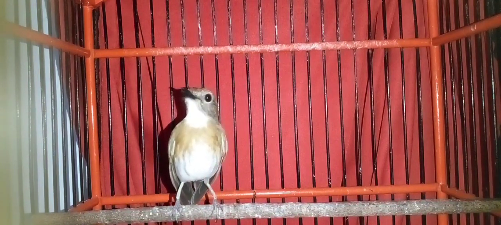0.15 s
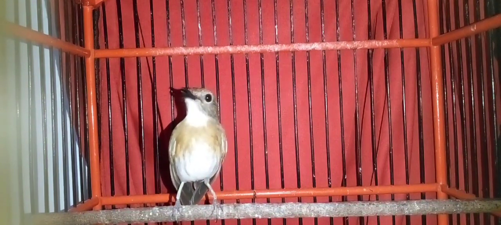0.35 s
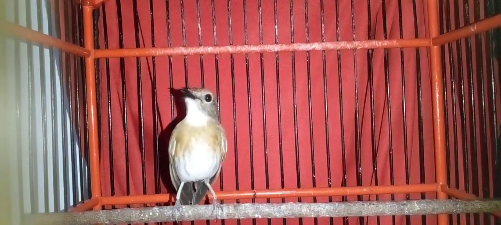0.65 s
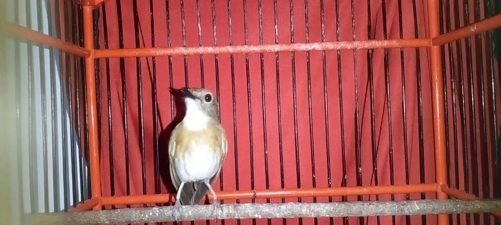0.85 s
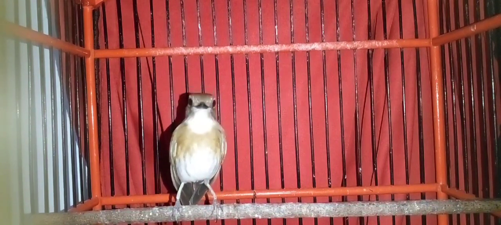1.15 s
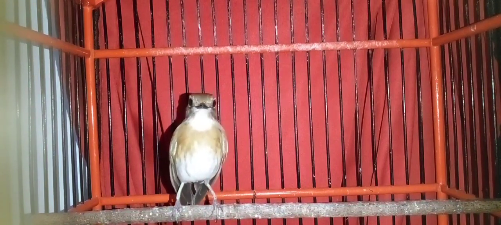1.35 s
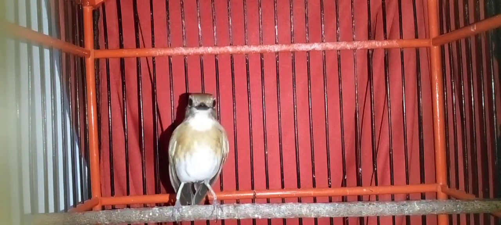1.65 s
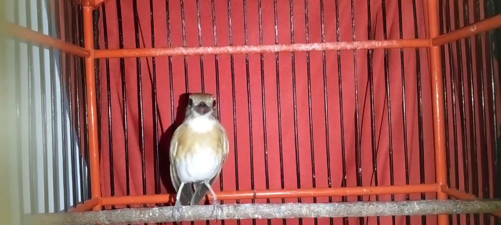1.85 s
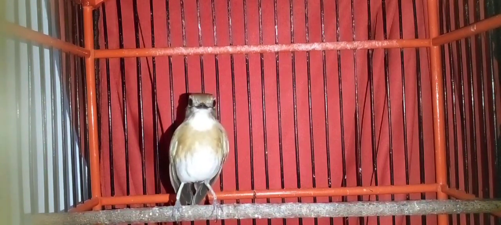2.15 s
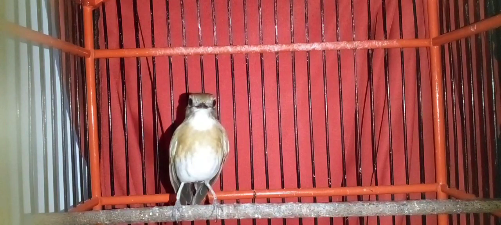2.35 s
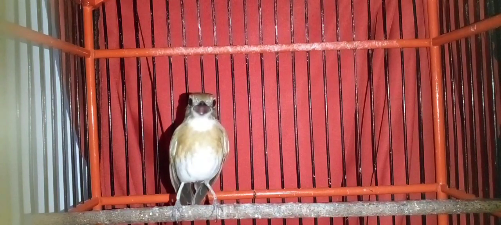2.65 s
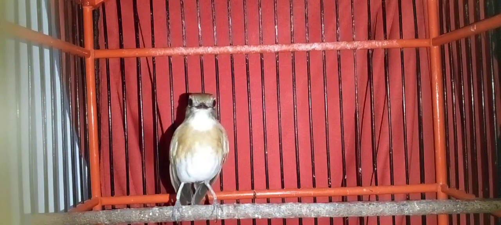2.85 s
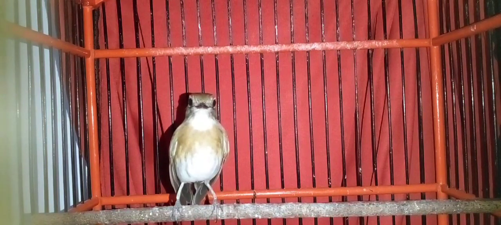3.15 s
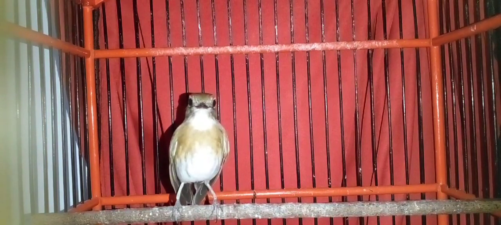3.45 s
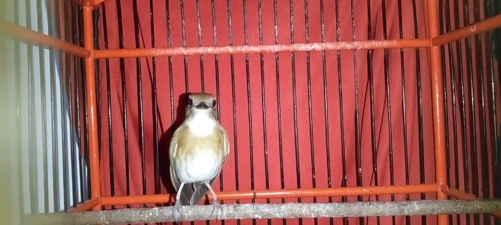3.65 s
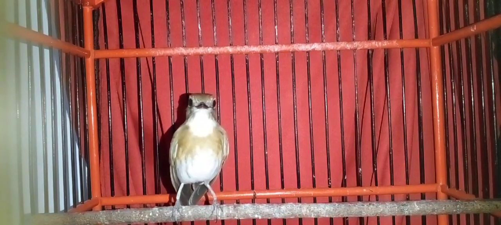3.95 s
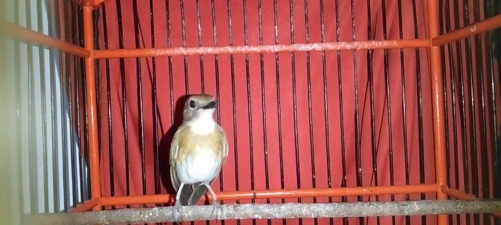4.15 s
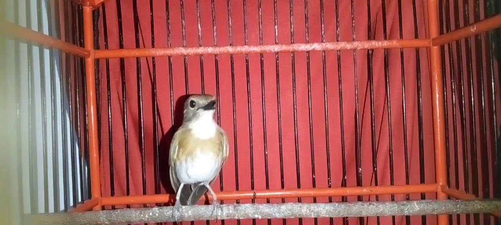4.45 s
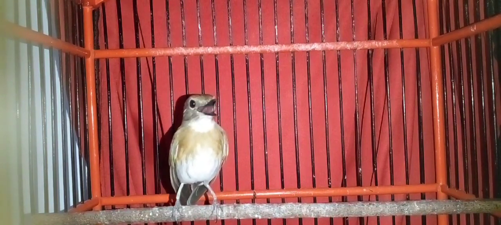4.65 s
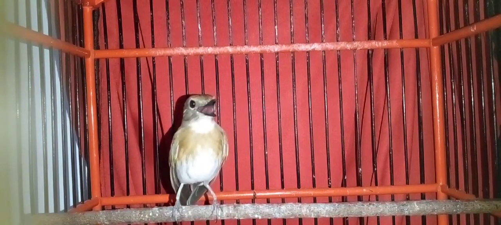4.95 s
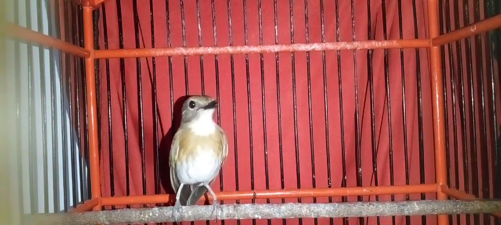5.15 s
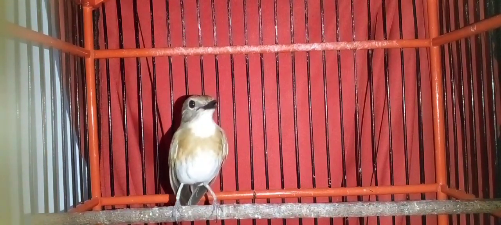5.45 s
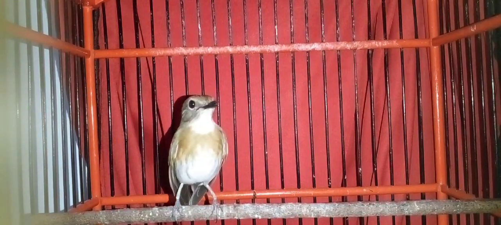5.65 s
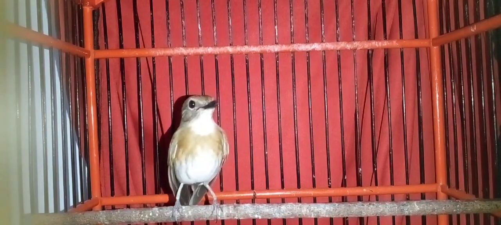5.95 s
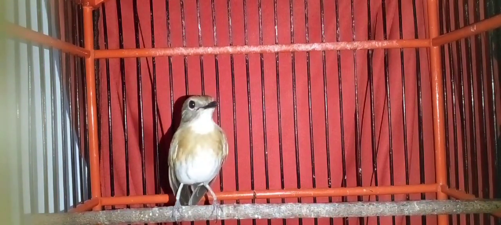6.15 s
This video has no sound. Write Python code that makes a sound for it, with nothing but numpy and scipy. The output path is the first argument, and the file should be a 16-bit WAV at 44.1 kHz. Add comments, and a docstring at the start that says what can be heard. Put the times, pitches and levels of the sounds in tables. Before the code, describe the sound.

Close, loud bird song indoors, varied and broken by short pauses, ends in rapid high trills and quavering tweets while a far vehicle slowly approaches.

```python
"""A small caged songbird sings close to the microphone in a quiet room at night: two-voiced squeals, twitters,
whip-like chips, pure whistles, falling trills and quavering tweets, built from gliding partials and shaped noise.
Its bill ticks faintly; near walls echo it and the room rings briefly.
Far-off engines hum outside as wavering low tones, over filtered-noise rumble and tyres that draw nearer.
A thin high hiss hangs in the background."""
import sys
import numpy as np
from scipy import signal
from scipy.fft import rfft, irfft
from scipy.io import wavfile
from scipy.ndimage import uniform_filter1d, minimum_filter1d

SR = 44100
rng = np.random.default_rng(int(sys.argv[2]) if len(sys.argv) > 2 else 0)


def store_pcm(level_fs):
    """Save levels as 16-bit WAV."""
    pcm = np.round(np.clip(level_fs, -1, 1) * 32767).astype(np.int16)
    wavfile.write(sys.argv[1], SR, np.atleast_2d(pcm).T)


N = 278712
LEAD_S = .3  # the tracks begin this early, so sounds may already be under way
TOP_HZ = 15900  # the recorder's upper limit

# two voices at once: start_s, length_s, low_hz, high_from_hz, high_to_hz, level_db, roughness at the peak (0-1)
SQUEAL_NOTES = [(.225, 0.1256, 5495, 8048, 7784, -29, 0.25), (.442, .139, 5415, 8080, 7477, -27.5, .3)]
# a level note, then a low slur: start_s, length_s, from_hz, to_hz, level_db, slur_length_s, slur_db
TWITTER_NOTES = [(.793, 0.0299, 2813, 2995, -16.5, 0.04, -28),
                 (0.862, 0.0275, 2439, 3148, -14.5, 0.0463, -25),
                 (.948, 0.03094, 2629, 3069, -13.5, 0.0319, -23.5),
                 (1.054, 0.033, 2597, 2885, -18, 0.024, -24.5),
                 (1.191, 0.0304, 3340, 3020, -16, 0.0216, -26)]
# rising chips that move into their octave: start_s, length_s, from_hz, to_hz, octave_level_db
CHIP_NOTES = [(1.709, .059, 2632, 3021, -4.5), (1.864, .055, 2780, 3061, -5)]
# very fast downward whips: loudest_s, rise_s, fall_s, top_hz, end_hz, level_db, rasp_db, thump_db
WHIP_NOTES = [(1.763, 0.00491, 0.0183, 5700, 2871, -7.5, -20.5, -31.5),
              (1.922, 0.00389, 0.01164, 5778, 2799, -6.5, -26, -31),
              (2.6658, 0.007, 0.0076, 6300, 2318, -13, -14, -39.5),
              (2.7167, 0.00495, 0.00556, 6433, 2075, -7.5, -11.5, -23.5)]
# rasp of the whips: pitch_hz, relative level (dB per Hz)
WHIP_RASP_SPECTRUM = [(900, -22.5), (1600, -4), (6600, 22), (8500, -14), (12500, 2)]
# a rush of air that leads into the first lone whip: start_s, length_s, level_db
AIR_RUSH = (2.647, .018, -39)
# mellow whistles: start_s, length_s, from_hz, to_hz, level_db, loudest at (share of length), fade_db,
# flutter from (share of length), flutter depth (0-1), overtones_db, hoarseness at the end (0-1)
WHISTLE_NOTES = [(3.607, 0.2394, 2668, 3168, -13, 0.768, 4, 0.147, .67, -1, 0.01),
                 (3.958, 0.2127, 2455, 2195, -21, 0.451, 13, 0.481, 0.77, 2, 0.02),
                 (4.33, .2, 2648, 3202, -10, 0.896, 4, 0.053, 0.31, -4.5, 0.01)]
# overtones of the whistles from the octave up: level_db against the fundamental
WHISTLE_OVERTONES_DB = [-30, -51.5, -46.5, -46.5, -47.5]
# faint slides between the louder notes: start_s, length_s, from_hz, to_hz, level_db
SLIDE_NOTES = [(0.576, 0.0515, 8150, 8477, -34), (0.728, 0.185, 5939, 5883, -44.5),
               (0.907, 0.0468, 2124, 2410, -36), (0.909, 0.03, 3060, 3468, -31.5),
               (.998, .032, 3079, 2873, -23.5), (4.573, 0.0508, 6067, 6053, -33.5)]
# the octave of a slide grows with its end pitch: pitch_hz, level_db against the fundamental
SLIDE_OCTAVE_LEVELS = [(3300, -32.5), (5800, -8)]
# thin falling whistles: start_s, length_s, from_hz, to_hz, level_db
THIN_NOTES = [(3.195, 0.3102, 7299, 5850, -36), (6.034, 0.336, 7095, 6174, -37.5)]
# piercing notes that open each trill: start_s, length_s, pitch_hz, level_db, swell_db
PIERCING_NOTES = [(4.599, 0.01614, 5937, -8.5, 11.5), (4.624, 0.0141, 6279, -2, 6),
                  (4.833, 0.0296, 5604, -16.5, 17), (4.85, 0.0226, 5641, -8.5, 13.5),
                  (4.876, .023, 5657, -7, 0.5), (4.9, 0.02024, 5720, -3, 12)]
# trill notes, held high then snapped down: loudest_s, top_hz, snap_hz, top_db, snap_db, thump_db, thump_hz
TRILL_NOTES = [(4.635, 5970, 5705, -25, -30.5, -27.5, 58), (4.665, 7304, 6686, -17, -8.5, -34, 235.6),
               (4.694, 7742, 6847, -17, -11, -31, 231.2), (4.725, 8194, 7066, -18, -11, -28.5, 283),
               (4.752, 8332, 7870, -21.5, -16, -30.5, 270.5), (4.941, 6578, 6283, -8, -3, -15.5, 93.5),
               (4.9707, 7716, 6114, -30, -4.5, -17, 149), (4.999, 7883, 6206, -25, -4, -22.5, 224.3),
               (5.028, 7832, 6953, -21, -10, -28, 250)]
# tweets that leap up and quaver away: start_s, length_s, top_hz, level_db, fade_db, quaver from (s into the note)
TWEET_NOTES = [(-.125, 0.0877, 4002, -12, 18.5, 0.0463), (5.088, 0.1018, 3770, -10, 9.5, 0.0544),
               (5.28, 0.1312, 3844, -9, 14.5, 0.0495), (5.488, 0.1079, 4750, -8.5, 21, .05),
               (6.007, 0.0994, 3953, -9.5, 17.5, 0.0369)]
# overtones of the piercing notes: level_db against the fundamental
PIERCING_OVERTONES_DB = [-24.5]
# overtones above the octave in chips and tweets: level_db against that octave
OCTAVE_OVERTONES_DB = [-34, -23]
# faint dry ticks: start_s, level_db
BILL_TICKS = [(2.829, -42.5), (2.863, -42), (5.791, -47), (5.84, -45.5)]
# near walls: delay_s, level_db
WALL_ECHOES = [(.0045, -13), (0.0141, -16.5)]
# bands of the room's tail: centre_hz, weight_db, t60_s
ROOM_BANDS = [(2198, -14, 0.4), (3310, -20.5, 0.57), (5960, -16.5, 0.42), (11500, -11.5, 0.29)]
# far engines that come and go: start_s, length_s, from_hz, to_hz, level_db
ENGINE_RUNS = [(-.2, 1.178, 90.02, 81.37, -39.5), (.9, 0.599, 81.22, 78.65, -37),
               (1.498, 1.085, 98.42, 88.15, -47), (2.5, 1.028, 92.8, 87.39, -48),
               (3.652, 1.1, 93.14, 94.89, -52)]
# a low hum that sinks slowly and wavers: from_hz, to_hz, level_db
LOW_HUM = (170, 140, -57.5)
# spectra of the low rumble, the tyres and the hiss: pitch_hz, relative level (dB per Hz)
RUMBLE_SPECTRUM = [(18, -49.5), (30, -15.5), (91, -6.5), (172, -9), (194, -17), (1800, -68.5), (2700, -110)]
TYRE_SPECTRUM = [(40, -13.5), (100, 5.5), (600, -13), (1500, -23.5), (2600, -31), (8000, -46)]
HISS_SPECTRUM = [(5000, -25), (6400, -1.5), (7600, -18.5)]
# a vehicle drawing nearer: time_s, level_db
TYRE_LEVELS = [(4.3, -67), (5.3, -60), (6.32, -47)]


def squeals(flutter_hz=105, throb=.55, rough_hz=380, high_octave_db=-9, low_octave_db=-11, sum_db=-12,
            difference_db=-24, settle_hz=800, settle_s=.08, rough_per_db=.1746, rasp_db=-13, onset_db=5):
    """Both sides of the syrinx flutter alone and modulate each other; the low voice starts ragged and settles."""
    for start, length, low_hz, from_hz, to_hz, peak_db, roughness in SQUEAL_NOTES:
        t, u = clock(length)
        level_db = arch(u, peak=0.705, rise_db=13, fall_db=2.5)
        rough = roughness + rough_per_db * level_db  # passes below zero in the quiet parts
        ragged = np.exp(-t / (settle_s * roughness))  # rougher notes settle later
        low_beat, high_beat = (quaver(t, flutter_hz, .35) for _ in range(2))
        depth = np.minimum(2 * rough, throb)

        low_pitch = low_hz + settle_hz * ragged * (1 + low_beat) + rough * rough_hz * walk(t, 2500)
        low = (1 + depth * low_beat) * tone(low_pitch, [low_octave_db])
        high_glide = from_hz + (to_hz - from_hz) * ease(u / .85)
        high_pitch = high_glide + rough * rough_hz * (walk(t, 2500) + high_beat)
        high = (1 + depth * high_beat) * tone(high_pitch, [high_octave_db])

        # multiplying the voices gives their sum and difference tones
        mixed = colour(low * high * (1 + low), [(1500, -55), (2500, difference_db), (13000, sum_db)])
        rasp = rough * noise(t, [(1500, -47.5), (2500, -11.5), (7000, -12), (10000, -15.5), (15000, -9.5)])
        onset_rasp = undb(onset_db) * ragged * noise(t, [(4800, -39), (6200, 3.5), (9500, -37)])
        voices = high + undb(onset_db * ragged - 5) * low + mixed
        soft_ends = signal.windows.tukey(len(t), .15)
        yield start, undb(peak_db + level_db) * soft_ends * (voices + undb(rasp_db) * (rasp + onset_rasp))


def twitters(settle_s=.0058, slur_top_hz=2260, slur_end_hz=1970, crest=0.16, overlap=.42, slur_jitter=0.014,
             rasp_db=-18, grain_db=2.5):
    """A short note bends onto its pitch; the syrinx's other side takes over with a hoarse, grainy falling slur."""
    for start, length, from_hz, to_hz, peak_db, slur_length, slur_db in TWITTER_NOTES:
        t, u = clock(length)
        hz = (to_hz + (from_hz - to_hz) * np.exp(-t / settle_s)) * (1 + 0.014 * walk(t, 790))
        yield start, undb(peak_db + arch(u, peak=0.72, rise_db=13, fall_db=5.5)) * tone(hz, [-31])

        t, u = clock(slur_length)
        jitter = slur_jitter * (walk(t, 2000) + walk(t, 200) / 2)
        bend = ((u - crest) / (1 - crest)) ** 2
        hz = (slur_top_hz + (slur_end_hz - slur_top_hz) * bend) * (1 + jitter)
        octave = undb(-13 + grain_db * walk(t, 270)) * tone(hz, [-16], first=2)
        rasp = noise(t, [(500, -24.5), (1300, -16.5), (2200, 4), (4400, 1), (7500, -19.5)])
        slur = tone(hz) + octave + undb(rasp_db) * rasp
        level_db = slur_db + arch(u, peak=.55, rise_db=12, fall_db=8) + grain_db * walk(t, 200)
        yield start + length - overlap * slur_length, undb(level_db) * slur


def chips(glide_share=.78, lift=0.21, split_s=0.013, low_voice_db=-15):
    """The throat rings near 6 kHz, so the octave outgrows the lower voice, which splits off upward at the end."""
    for start, length, from_hz, to_hz, level_db in CHIP_NOTES:
        t, u = clock(length)
        hz = (from_hz + (to_hz - from_hz) * ease(u / glide_share)) * (1 + 0.02 * walk(t, 560))
        split = lift * np.maximum(1 - (length - t) / split_s, 0)
        low = undb(low_voice_db + arch(u, peak=0.97, rise_db=25, fall_db=3.5)) * tone(hz * (1 + split))
        octave_level = undb(arch(u, peak=.98, rise_db=55, fall_db=-5.5))  # still growing at the end
        octave = octave_level * tone(hz, OCTAVE_OVERTONES_DB, first=2)
        yield start, undb(level_db) * (low + octave)


def whips(recoil_hz=4400, recoil_db=-13, attack_db=24, plunge_share=.66, plunge_db=16, recoil_share=1.6):
    """The pitch plunges within milliseconds, breaks up and curls back, with a rasp at its loudest."""
    for loudest, rise, fall, top, end, peak_db, rasp_db, thump_db in WHIP_NOTES:
        t, _ = clock(rise + (plunge_share + recoil_share) * fall)
        attack = np.minimum(t / rise, 1)
        plunge = np.clip((t - rise) / (plunge_share * fall), 0, 1)
        recoil = np.maximum((t - rise) / fall - plunge_share, 0) / recoil_share

        hz = top + (end - top) * plunge + (recoil_hz - end) * ease(recoil / .36)
        hz = hz * (1 + .14 * plunge * walk(t, 1500))
        plunge_level = attack_db * (attack - 1) - plunge_db * plunge
        recoil_level = recoil_db + arch(recoil, peak=.48, rise_db=19.5, fall_db=16)
        level_db = np.where(recoil > 0, recoil_level, plunge_level)

        voice = undb(level_db + peak_db) * tone(hz, [-28])
        rasp_fades = ease(attack) * ease(2 * (1 - recoil))
        rasp = undb(level_db / 2 + rasp_db) * rasp_fades * noise(t, WHIP_RASP_SPECTRUM)
        yield loudest - rise, voice + rasp
        yield thump(loudest, thump_db)


def air_rush():
    """A brief rush of noise in the colour of the whips' rasp."""
    start, length, level_db = AIR_RUSH
    t, u = clock(length)
    yield start, undb(level_db) * ease(10 * u) * ease(10 * (1 - u)) * noise(t, WHIP_RASP_SPECTRUM)


def thump(loudest, level_db, pitch_hz=130, cycles=.6, burst_db=-12, burst_s=0.0055):
    """The sharpest notes jolt the microphone: a low thump in a soft noise burst; higher is shorter and noisier."""
    t = np.arange(SR // 10) / SR - 1 / 50
    beats = t * pitch_hz
    jolt = np.cos(2 * np.pi * beats) * ease(2 * beats + 1) * np.exp(-np.maximum(beats, 0) / cycles)
    burst = noise(t, [(400, 4.5), (1500, -14), (2100, -27.5)]) * np.exp(-np.abs(t) / burst_s)
    burst_level = undb(burst_db) * pitch_hz / 300  # burst_db holds for a 300 Hz thump
    return loudest + t[0], undb(level_db) * (jolt + burst_level * burst)


def whistles(flutter_hz=50, glide_share=.88, glide_power=1.9, scoop=.25, scoop_s=0.0059, crackle_db=-41,
             crackle_spread_db=7):
    """Nearly pure glides steepen, flutter unevenly and turn hoarse, with uneven crackle in the flutter's gaps."""
    for (start, length, from_hz, to_hz, peak_db, peak, fade_db,
         breaks_at, flutter, bright_db, hoarseness) in WHISTLE_NOTES:
        t, u = clock(length)
        glide = np.minimum(u / glide_share, 1) ** glide_power - scoop * np.exp(-t / scoop_s)
        depth = flutter * ease((u - breaks_at) / 0.091)
        dip = depth * ((1 - quaver(t, flutter_hz, .22)) / 2) ** 2  # deep flutter nearly breaks the tone
        rough = hoarseness * ease(2 * u - 1) ** 2
        wobble = 1 - 0.03 * dip + 0.0056 * walk(t, 120) + rough * walk(t, 1500)
        voice = tone((from_hz + (to_hz - from_hz) * glide) * wobble, np.add(WHISTLE_OVERTONES_DB, bright_db))

        crackle_level = undb(crackle_db + crackle_spread_db * walk(t, 50)) * dip * depth
        crackle = crackle_level * noise(t, [(2000, -17.5), (4500, 0.5), (7500, -24.5)])
        level = undb(peak_db + arch(u, peak, rise_db=27, fall_db=fade_db))
        yield start, level * ((1 + depth / 2 - 2.1 * dip) * voice + crackle)


def slides():
    """Faint straight glides that link the louder notes."""
    for start, length, from_hz, to_hz, level_db in SLIDE_NOTES:
        t, u = clock(length)
        hz = (from_hz + (to_hz - from_hz) * u) * (1 + 0.0059 * walk(t, 600))
        octave_db = np.interp(to_hz, *np.transpose(SLIDE_OCTAVE_LEVELS))
        yield start, undb(level_db + arch(u, peak=0.22, rise_db=8.5, fall_db=7)) * tone(hz, [octave_db])


def thin_whistles(swoop_hz=1400, throb_hz=9.7, throb_db=4, first_throb_s=0.059, octave_db=-6, brighten_db=18):
    """A high thread of tone swoops in and sinks a step with each slow throb, growing brighter."""
    for start, length, from_hz, to_hz, peak_db in THIN_NOTES:
        t, u = clock(length)
        beat = 2 * np.pi * throb_hz * (t - first_throb_s)
        hz = from_hz + (to_hz - from_hz) * u + swoop_hz * np.exp(-t / .017) - 70 * np.sin(beat)
        hz = hz * (1 + .014 * walk(t, 900))
        level_db = peak_db + arch(u, peak=0.396, rise_db=12.5, fall_db=19.5) + throb_db * (np.cos(beat) - .5)
        octave = undb(octave_db - brighten_db * (1 - u)) * tone(hz, first=2)
        yield start, undb(level_db) * (tone(hz) + octave)


def piercing_notes(droop=0.041):
    """Arched, piercing notes whose pitch droops at both ends."""
    for start, length, pitch_hz, level_db, swell_db in PIERCING_NOTES:
        t, u = clock(length)
        hz = pitch_hz * (1 - droop * (2 * u - 1) ** 2 + .003 * walk(t, 900))
        level = undb(level_db + arch(u, peak=0.62, rise_db=swell_db, fall_db=7.5))
        yield start, level * tone(hz, PIERCING_OVERTONES_DB)


def trills(hold_s=.016, release_s=0.0086, drop_lead_s=0.01, drop_s=.01692, snap_width_s=0.002886, click_db=-26):
    """A chain of falling snaps, about 35 a second; only the hardest ones click."""
    for loudest, top_hz, snap_hz, top_db, snap_db, thump_db, thump_hz in TRILL_NOTES:
        t, u = clock(hold_s + release_s)
        drop = 1.25 * ease((t - hold_s + drop_lead_s) / drop_s)  # ends a quarter beyond the snap pitch
        hz = (top_hz + (snap_hz - top_hz) * drop) * (1 + 0.0047 * u * walk(t, 1500))
        held = undb(top_db + arch(u, peak=0.957, rise_db=10, fall_db=2.5))
        snap = undb(snap_db) / (1 + ((t - hold_s) / snap_width_s) ** 2) ** 2
        click = undb(click_db) * snap ** 2 * (snap > .4) * rng.standard_normal(len(t))
        yield loudest - hold_s, np.maximum(held, snap) * tone(hz, [-16]) + click
        yield thump(loudest, thump_db, thump_hz)


def tweets(low_hz=1500, scoop_hz=2330, scoop_s=0.005, leap_at_s=.021, leap_s=.011, settle_s=0.0088,
           hold_hz=3120, loudest_s=0.04173, attack_db=20, throat_hz=3270, throat_width_hz=640, quaver_hz=122,
           quaver_share=0.0548, quaver_depth=0.27, scoop_octave_db=-5, octave_db=-27):
    """A low scoop leaps up through the throat's resonance, glides back across it and fades with a fine ripple."""
    for start, length, top_hz, peak_db, fade_db, quaver_s in TWEET_NOTES:
        t, _ = clock(length)
        scoop = scoop_hz + (low_hz - scoop_hz) * np.exp(-t / scoop_s)
        settle = hold_hz + (top_hz - hold_hz) * np.exp(-np.maximum(t - leap_at_s - leap_s, 0) / settle_s)
        leap = ease((t - leap_at_s) / leap_s)
        swing = ease((t - quaver_s) / settle_s) * quaver(t, quaver_hz, 0.11)
        wobble = 1 + quaver_share * swing + 0.0095 * walk(t, 70) + 0.0078 * walk(t, 2500)
        hz = (scoop + (settle - scoop) * leap) * wobble

        tail = np.maximum(t - loudest_s, 0) / (length - loudest_s)
        effort = undb(peak_db - attack_db * np.maximum(1 - t / loudest_s, 0) - fade_db * tail)
        throat = 1 / (1 + ((hz - throat_hz) / throat_width_hz) ** 2)
        octave_level = undb(scoop_octave_db + (octave_db - scoop_octave_db) * np.sqrt(leap))
        octave = octave_level * throat ** (2 * leap) * tone(hz, OCTAVE_OVERTONES_DB, first=2)
        yield start, effort * throat * (1 + quaver_depth * swing) * (tone(hz) + octave)


def ticks(gap_s=0.012, peak_s=0.00263):
    """Soft double ticks of the bill: short bursts of bright noise, the second one weaker."""
    t = np.arange(SR // 25) / SR
    for start, level_db in BILL_TICKS:
        for delay, drop_db in (0, 0), (gap_s, -7):
            burst = noise(t, [(4000, -25.5), (6700, 2.5), (12500, -7.5), (13800, -37.5)])
            envelope = t / peak_s * np.exp(1 - t / peak_s)
            yield start + delay - .002, undb(level_db + drop_db) * burst * envelope


def room(x):
    """Direct sound, a few near echoes and a diffuse tail of noise bands whose top band dies first."""
    t = np.arange(SR) / SR
    centres, weights_db, t60s = np.transpose(ROOM_BANDS)
    f, grain = np.fft.rfftfreq(SR, 1 / SR), rfft(rng.standard_normal(SR))
    response = np.zeros(SR)
    for share, weight_db, t60 in zip(np.eye(len(ROOM_BANDS)), weights_db, t60s):
        decay = undb(-60 * t / t60) * (1 - np.exp(-t / 0.027))  # the tail builds up softly
        band = irfft(grain * np.interp(f, centres, share), SR)
        response += undb(weight_db) * band * decay / np.linalg.norm(decay)
    response[0] += 1
    for delay, level_db in WALL_ECHOES:
        response[int(delay * SR)] += undb(level_db)
    return signal.fftconvolve(x, response)[:len(x)]


def engines():
    """Engines come and go over a low hum that sinks slowly and wavers."""
    for start, *run in ENGINE_RUNS:
        yield start, motor(*run)
    yield -LEAD_S, motor(N / SR + 2 * LEAD_S, *LOW_HUM)


def motor(length_s, from_hz, to_hz, level_db, fade_s=.18):
    """A far-off motor, heard through the walls as a wavering low tone that fades in and out."""
    t, u = clock(length_s)
    hz = (from_hz + (to_hz - from_hz) * u) * (1 + 0.0056 * walk(t, 30))
    fades = ease(t / fade_s) * ease((length_s - t) / fade_s)
    return undb(level_db + 1.2 * walk(t, 8.9)) * fades * tone(hz, [-16])


def rumble(t):
    """Low town rumble: deep noise whose level drifts slightly."""
    return undb(-54.5 + 0.74 * walk(t, 2.4)) * noise(t, RUMBLE_SPECTRUM)


def tyres(t):
    """Tyres drawing nearer: road noise that grows louder."""
    return undb(np.interp(t, *np.transpose(TYRE_LEVELS)) + walk(t, 2.4)) * noise(t, TYRE_SPECTRUM)


def hiss(t):
    """A thin hiss: a narrow high noise band with a slight flicker."""
    return undb(-73 + .8 * walk(t, 21)) * noise(t, HISS_SPECTRUM)


def undb(db):
    """Turn dB into a linear gain."""
    return 10 ** (np.asarray(db) / 20)


def add(out, start, wave):
    """Mix a wave into a track that begins LEAD_S early."""
    i = max(int((start + LEAD_S) * SR), 0)
    out[i:i + len(wave)] += wave[:len(out) - i]


def clock(length_s):
    """Seconds since the start of a note, and the share of it that has passed."""
    t = np.arange(int(length_s * SR)) / SR
    return t, t / t[-1]


def arch(u, peak, rise_db, fall_db):
    """Level in dB that rises by rise_db until the share `peak`, then falls by fall_db (rises if negative)."""
    peak = np.clip(peak, .02, .98)
    before, after = np.maximum(1 - u / peak, 0), np.maximum((u - peak) / (1 - peak), 0)
    return -rise_db * before ** 2 - fall_db * after ** 2


def ease(u):
    """A smooth step from 0 to 1."""
    return (1 - np.cos(np.pi * np.clip(u, 0, 1))) / 2


def walk(t, rate_hz):
    """Smooth chance with a spread near 1: random steps joined by ramps."""
    step = max(int(SR / rate_hz), 1)
    steps = np.repeat(rng.standard_normal(len(t) // step + 1), step)
    return uniform_filter1d(steps, step)[:len(t)]


def quaver(t, rate_hz, unevenness):
    """A swing between -1 and 1 whose rate changes from beat to beat."""
    rate = rate_hz * (1 + unevenness * walk(t, 2 * rate_hz))
    return np.sin(2 * np.pi * np.cumsum(rate) / SR)


def colour(x, points):
    """Filter by a spectrum of (Hz, dB) points."""
    hz, db = np.transpose(points)
    f = np.fft.rfftfreq(len(x), 1 / SR) + 1  # the offset avoids log(0)
    return irfft(rfft(x) * undb(np.interp(np.log(f), np.log(hz), db)), len(x))


def noise(t, points):
    """Coloured noise of rms 1."""
    x = colour(rng.standard_normal(len(t)), points)
    return x / x.std()


def tone(hz, overtones_db=(), first=1):
    """One partial of a moving pitch and the overtones above it, with soft ends."""
    phase = 2 * np.pi * np.cumsum(hz) / SR
    wave = np.zeros(len(hz))
    for k, db in enumerate([0, *overtones_db], first):
        wave += undb(db) * np.sin(k * phase) * (k * hz < SR / 2)  # silent above the Nyquist limit
    return wave * signal.windows.tukey(len(hz), min(.008 * SR / len(hz), .3))


def scene():
    """The song in its room, over the engines, rumble, tyres and hiss."""
    lead = int(LEAD_S * SR)
    song, hum = np.zeros(N + lead), np.zeros(N + lead)
    for phrase in (squeals, twitters, chips, whips, air_rush, whistles, slides, thin_whistles,
                   piercing_notes, trills, tweets, ticks):
        for start, wave in phrase():
            add(song, start, wave)
    for start, wave in engines():
        add(hum, start, wave)
    t = np.arange(N) / SR
    background = rumble(t) + tyres(t) + hiss(t)
    return ((room(song) + hum)[lead:] + background)[None]


def record(dry):
    """A fast limiter holds the loudest peaks, and the recorder cuts the top."""
    ceiling, hold = .88, SR // 500  # full scale = 1; hold in samples (2 ms)
    gain = minimum_filter1d(ceiling / np.maximum(np.abs(dry), ceiling), hold)
    gain = uniform_filter1d(gain, hold)
    top_cut = signal.ellip(10, .2, 80, TOP_HZ, fs=SR, output="sos")
    return signal.sosfilt(top_cut, dry * gain)


dry = scene()
out = record(dry)
store_pcm(out)
```